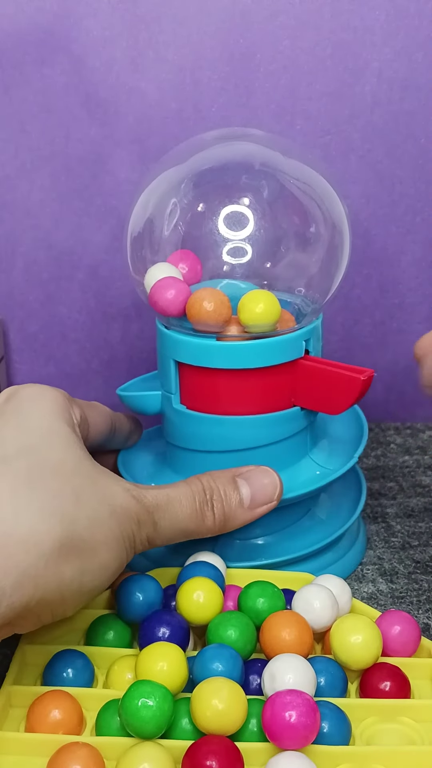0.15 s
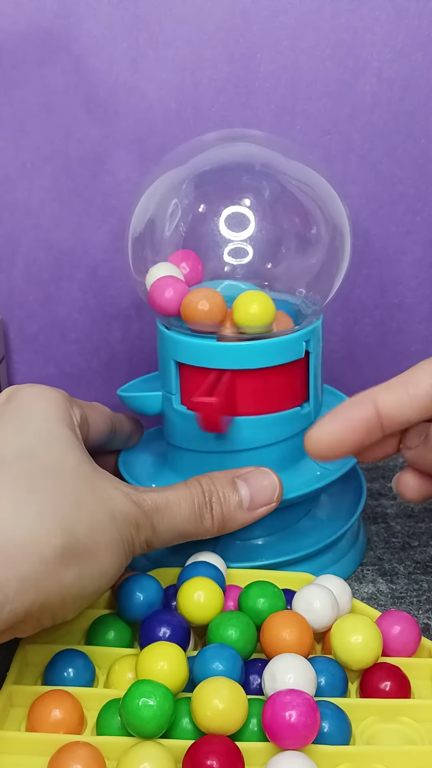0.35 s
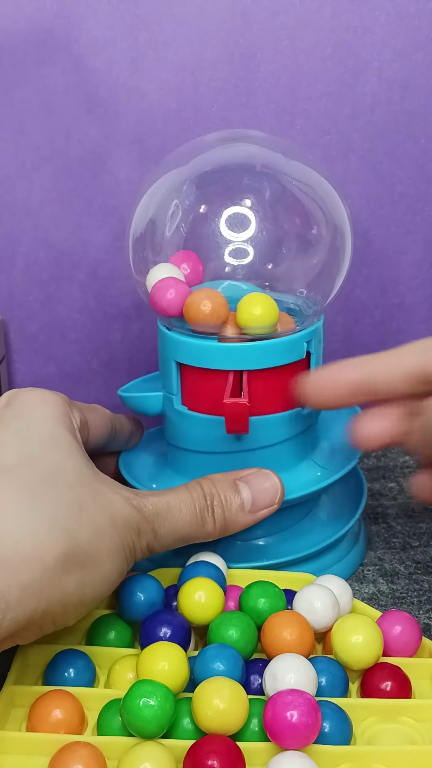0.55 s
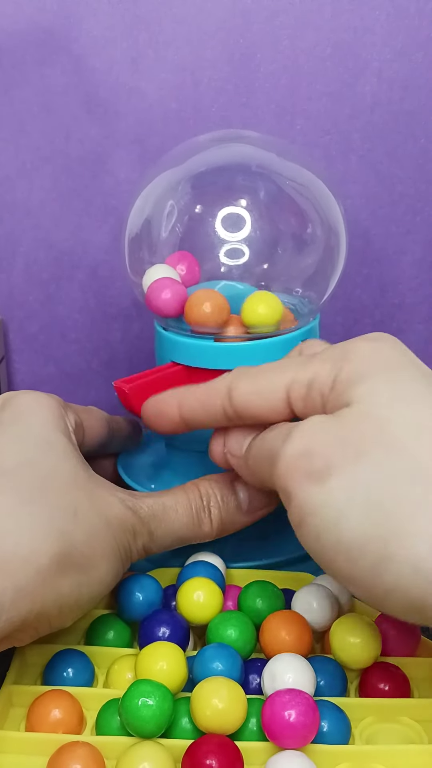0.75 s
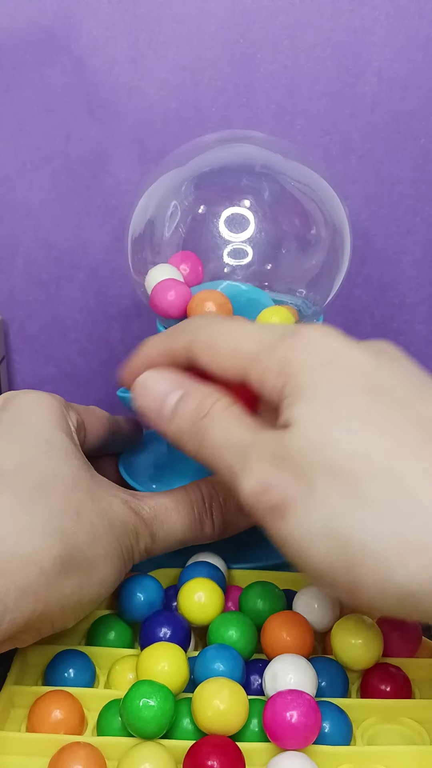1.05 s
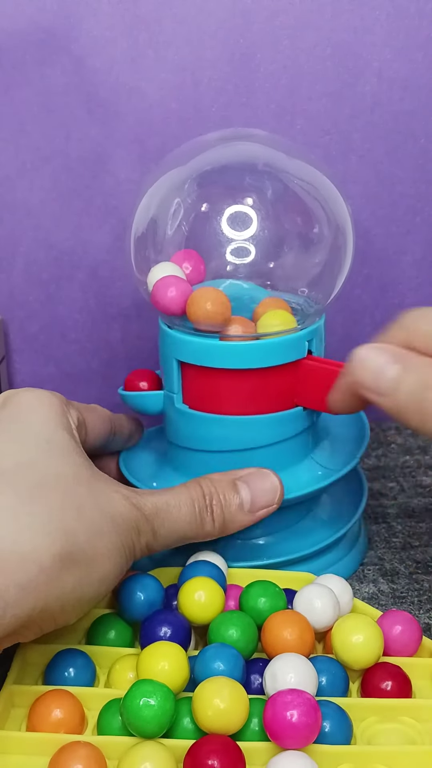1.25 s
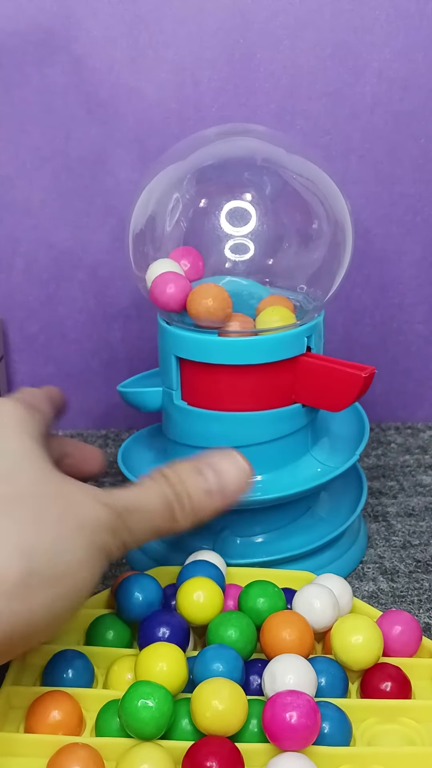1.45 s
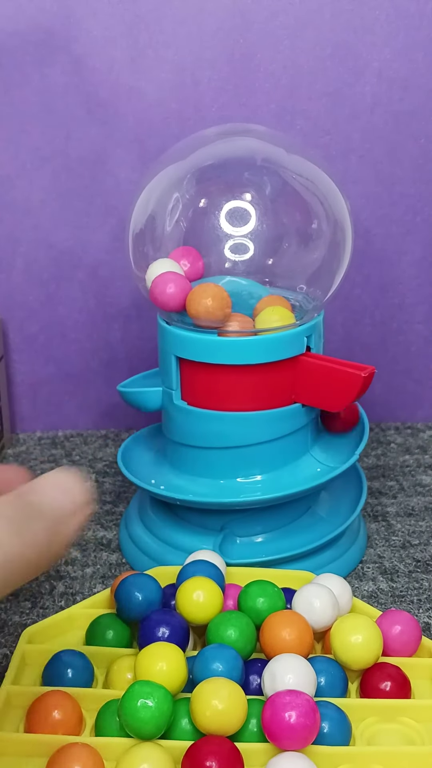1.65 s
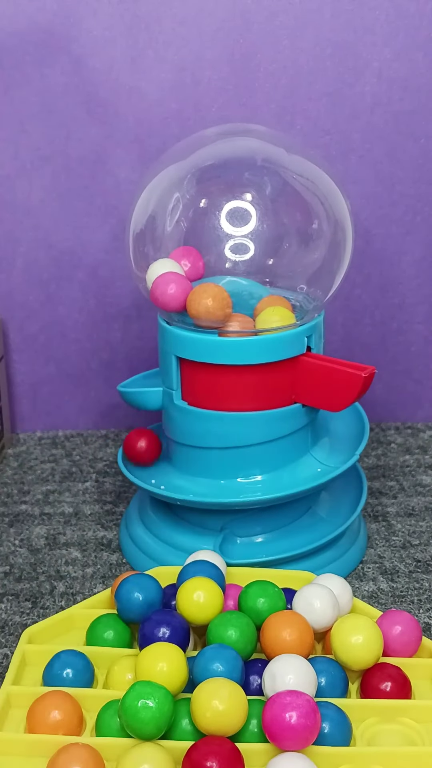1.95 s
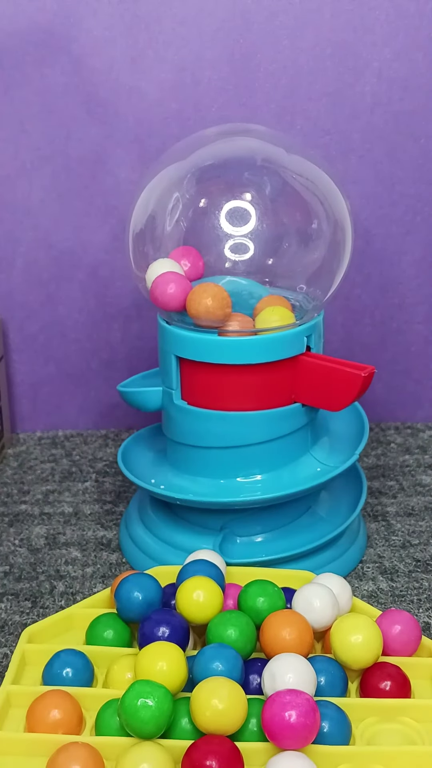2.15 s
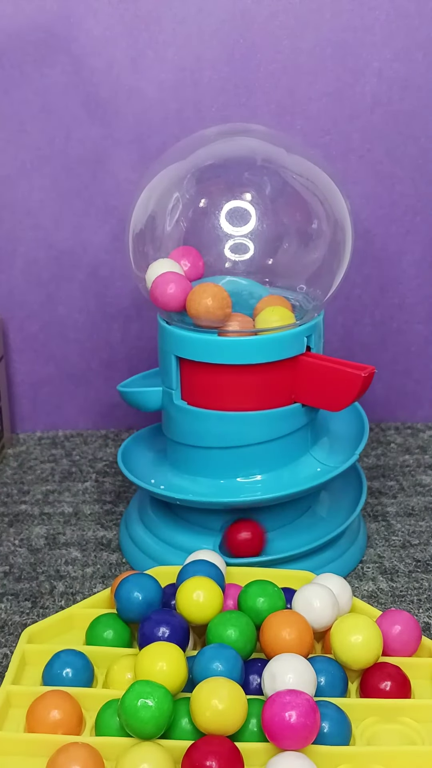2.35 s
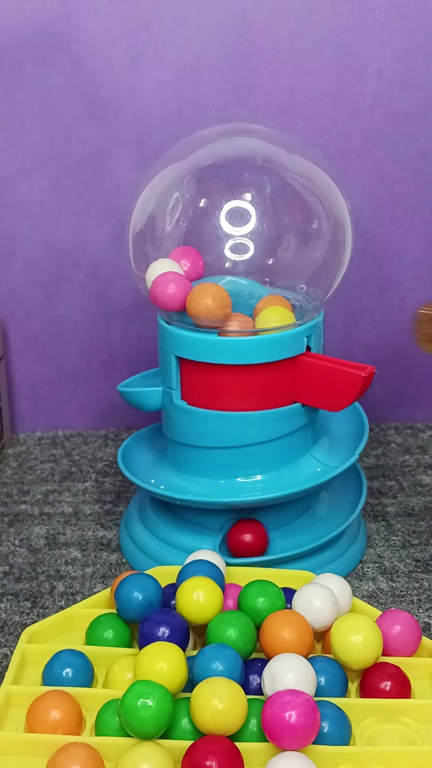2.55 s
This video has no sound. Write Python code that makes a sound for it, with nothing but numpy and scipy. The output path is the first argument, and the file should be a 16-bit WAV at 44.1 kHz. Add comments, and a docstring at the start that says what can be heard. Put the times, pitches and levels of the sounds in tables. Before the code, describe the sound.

Plastic toy lever clacking back and forth, balls knocking, one ball rolling down and bouncing to rest.

```python
"""Toy gumball machine

A hand swings the plastic lever to and fro in a small room. The lever snaps as noise bursts and
damped modes and scrapes as a train of tiny slips; balls knock with filtered bursts. One ball rolls
behind the tower and down the hollow spiral ramp as a rattle of random impacts, partly through wall
modes of gliding pitch, then bounces to rest on a ringing tray. A faint still air lies beneath.
"""
import sys
import numpy as np
from scipy import signal
from scipy.fft import rfft, irfft, next_fast_len
from scipy.io import wavfile

SR = 44100
rng = np.random.default_rng(int(sys.argv[2]) if len(sys.argv) > 2 else 0)


def output_pcm(signal):
    """Save a mono or channel-first signal as 16-bit PCM at the path in sys.argv[1].

    Samples are clipped to [-1, 1] before scaling.
    """
    pcm = np.clip(np.atleast_2d(signal).T, -1, 1) * 32767
    wavfile.write(sys.argv[1], SR, np.round(pcm).astype(np.int16))


N = 116865
T = np.arange(N) / SR
RING_T = T[:12000]  # time axis of one burst, ring or room tail (s)
FILTER_HZ = np.fft.rfftfreq(4096, 1 / SR)


def amp(db):
    """Logarithmic level: decibels become an amplitude gain."""
    return 10 ** (np.asarray(db) / 20)


def read(table, hz, axis=1):
    """Interpolation: one column of a table along a logarithmic frequency axis."""
    columns = np.transpose(table)
    return np.interp(np.log(hz + 1), np.log(columns[0]), columns[axis])


def curve(table, axis=1):
    """Envelope: one dB column of a time table, linear in dB, becomes a gain over the scene."""
    columns = np.transpose(table)
    return amp(np.interp(T, columns[0], columns[axis]))


def unit(x):
    """Energy normalization: the summed square becomes two, one per channel of a stereo pair."""
    return x / np.sqrt(np.sum(x ** 2) / 2 + 1e-20)


def add(mix, start_s, sound):
    """Superposition: a sound is added to the mix from its start time."""
    part = mix[:, round(start_s * SR):][:, :sound.shape[1]]
    part += sound[:, :part.shape[1]]


def dying(t60_s):
    """Exponential decay: the amplitude falls by 60 dB in t60_s."""
    return np.exp(-np.log(1000) * RING_T / t60_s)


# Microphone pair: freq_hz [Hz], likeness [0-1], left_lead_rad [rad], left_minus_right_db [dB]
MICROPHONE_PAIR = [(450, 0.98, 0.65, 0.5), (910, 0.3, 0.2, -5), (2103, 0.34, 1.93, 2), (3230, 0, 3.98, -6),
                   (8800, 0, 2.78, 6), (14400, 0.1, 6.9, 11.5)]


def paired(x):
    """Interchannel coherence: two unrelated signals become as alike as the two microphones hear."""
    hz = np.fft.rfftfreq(x.shape[1], 1 / SR)
    left, other = rfft(x)
    same = np.clip(read(MICROPHONE_PAIR, hz), 0, 1)
    lag = np.exp(-1j * read(MICROPHONE_PAIR, hz, axis=2))
    right = (same * left + np.sqrt(1 - same ** 2) * other) * lag
    return irfft(np.array([left, right]), x.shape[1])


def balance_db(hz):
    """Level difference: half of the pair's imbalance goes to each channel, with opposite signs."""
    return np.array([[.5], [-.5]]) * read(MICROPHONE_PAIR, hz, axis=3)


def colour(x, spectrum):
    """Minimum-phase filter: a causal response of unit energy, with the pair's balance."""
    log = np.log(amp(read(spectrum, FILTER_HZ) + balance_db(FILTER_HZ)))
    log = np.concatenate([log, log[:, -2:0:-1]], axis=1)
    taps = np.fft.ifft(np.exp(np.conj(signal.hilbert(log)))).real
    return signal.fftconvolve(x, unit(taps), axes=1)[:, :x.shape[1]]


SPOT_SHIFT = .05  # largest upward shift, as a share of frequency


def shifted(spectrum):
    """Dependence on the point of impact: the same colour, drawn a little higher or lower."""
    factor = 1 + SPOT_SHIFT * rng.uniform(-0.73, 1)
    return [(hz * factor, db) for hz, db in spectrum]


TREBLE_HZ = 4700  # middle of the shelf's slope


def brighten(x, gain):
    """Shelving: a zero-phase high band is raised or lowered by a gain."""
    size = next_fast_len(2 * x.shape[1])
    hz = np.fft.rfftfreq(size, 1 / SR)
    treble = irfft(rfft(x, size) * (1 - 1 / (1 + (hz / TREBLE_HZ) ** 6)), size)
    return x + (gain - 1) * treble[:, :x.shape[1]]


def burst(t60_s, rise_s):
    """Modal density: a crowd of quickly dying modes merges into noise with an even spectrum."""
    shape = dying(t60_s) * (1 - np.exp(-RING_T / rise_s))
    noise = rng.standard_normal((2, len(RING_T)))
    even = irfft(np.exp(1j * np.angle(rfft(noise * shape))))  # keep the phase, flatten the size
    return unit(paired(even) * np.minimum(1, 10 * dying(t60_s)))


def ring(modes):
    """Modal synthesis: damped sines with a random starting phase at each strike."""
    out = np.zeros((2, len(RING_T)))
    for hz, level_db, t60_s in modes:
        right_lag = np.array([[0], [read(MICROPHONE_PAIR, hz, axis=2)]])
        phase = 2 * np.pi * (hz * RING_T + rng.random()) - right_lag
        out += amp(level_db + balance_db(hz)) * unit(np.sin(phase) * dying(t60_s))
    return out * np.minimum(RING_T / 0.00063, 1)  # short onset ramp


def resonate(x, hz, t60_s):
    """Time-varying resonance: a mode of unit energy whose pitch follows a curve."""
    turn = np.exp(2j * np.pi * np.cumsum(hz) / SR)
    pole = np.exp(-np.log(1000) / (t60_s * SR))
    envelope = signal.lfilter([1], [1, -pole], x / turn)
    return np.sqrt(2 * (1 - pole ** 2)) * (turn * envelope).real


def grains(per_s, spread_db):
    """Random point process: tiny impacts of uneven size and either sign, of mean square two."""
    size = amp(spread_db * np.minimum(rng.exponential(1, N), 3)) * (rng.random(N) < per_s / SR)
    return unit(size * rng.choice([-1, 1], N)) * np.sqrt(N)


def excite(clicks, response, count=10):
    """Impulse response: each click lands on one of several spots, each with its own short answer."""
    spot = rng.integers(0, count, N)
    out = np.zeros((2, N))
    for k in range(count):
        here = (clicks * (spot == k))[None]
        out += signal.oaconvolve(here, response()[:, :2048], axes=1)[:, :N]
    return out


# Spectrum of the still air: freq_hz [Hz], level_db [dB, relative]
AIR_SPECTRUM = [(20, 2), (40, -16), (65, 7), (110, -13.5), (2000, -18.5), (15000, -28)]
AIR_DB = -70


def still_air():
    """Stationary noise: a faint coloured background, steady throughout."""
    return amp(AIR_DB) * colour(paired(rng.standard_normal((2, N))), AIR_SPECTRUM)


# Decay of the room: freq_hz [Hz], t60_s [s]
ROOM_DECAY = [(300, 0.2129), (3700, 0.09), (10000, 0.1745)]


def room(x, gap_s, rise_s):
    """Reverberation: dense reflections of a small room, each band dying at its own speed."""
    noise = paired(rng.standard_normal((2, len(RING_T))))
    hz, t, bands = signal.stft(noise, SR, nperseg=256)
    bands = bands * np.exp(-np.log(1000) * t / read(ROOM_DECAY, hz)[:, None])
    tail = signal.istft(bands, SR)[1][:, :len(RING_T)]
    tail = unit(tail * np.clip((RING_T - gap_s) / rise_s, 0, 1))
    return signal.fftconvolve(x, tail, axes=1)[:, :N]


# Ball rolling round the back of the tower: start_s [s], level_db [dB]
BEHIND_LEVEL = [(1.3, -82), (1.42, -55.5), (1.47, -63.5), (1.56, -55), (1.66, -63), (1.78, -72)]
# Spectrum heard from behind the tower: freq_hz [Hz], level_db [dB, relative]
TOWER_SPECTRUM = [(310, -23), (430, 5), (510, 9.5), (680, -13), (1650, -4.5), (2150, 1), (2700, -16),
                  (3400, -9.5), (5000, -22.5), (15000, -25.5)]


def rolling_behind():
    """Rolling contact: random impacts, coloured by the tower, merge into a murmur."""
    present = (T > BEHIND_LEVEL[0][0]) * (T < BEHIND_LEVEL[-1][0])
    contact = curve(BEHIND_LEVEL) * grains(per_s=1300, spread_db=5.5) * present
    taps = excite(contact, lambda: burst(t60_s=0.024, rise_s=0.0003))
    return colour(taps, TOWER_SPECTRUM)


# Ball rolling down the open ramp: start_s [s], level_db [dB], hollow_body_db [dB]
RAMP_LEVEL = [(1.66, -79.5, -1), (1.75, -62.5, -11), (1.79, -60, -7.5), (1.93, -54, -16), (1.99, -56.5, -2),
              (2.1, -57, 8.5), (2.25, -53.5, 1.5), (2.34, -53, -23), (2.43, -66, -5)]
# Hops on the seams of the ramp: start_s [s], level_db [dB]
SEAM_HOPS = [(1.756, -20.5), (1.772, -20), (1.802, -20.5), (1.814, -21), (1.9, -24), (2.018, -20.5),
             (2.042, -20), (2.069, -19), (2.096, -20), (2.109, -16.5), (2.171, -19), (2.208, -14),
             (2.221, -15.5), (2.241, -21.5), (2.254, -16.5), (2.281, -17.5), (2.302, -18.5), (2.338, -16.5)]
# Ramp wall modes: pitch_hz [Hz], level_db [dB], t60_s [s], swing [share of pitch, round a turn]
WALL_MODES = [(840, -11, 0.028, .2), (1620, -9, 0.02, -.1), (2130, -7.5, 0.018, -.1), (3250, -6, 0.01, .07)]
# Rattle growing duller on the last turn: start_s [s], treble_db [dB]
LAST_TURN_TREBLE = [(2.26, 2.5), (2.33, -10.5)]
# Spectra of the ramp and of the hollow body: freq_hz [Hz], level_db [dB, relative]
RAMP_SPECTRUM = [(60, -1), (300, -21), (620, 3.5), (1150, 2), (2200, 8), (3400, 5), (5500, -7.5),
                 (13000, -10.5), (16000, -29)]
HOLLOW_SPECTRUM = [(40, -26), (190, -30.5), (350, -22.5), (435, -1.5), (525, 1), (615, -18), (850, -14.5),
                   (8000, -61.5)]
LAP_S, FRONT_S = 0.462, 1.93  # one turn of the spiral; a moment of full swing of the wall modes


def rolling_ramp():
    """Rolling contact: impacts rattle the ramp, sweep its wall modes and make the hollow body drone."""
    present = (T > RAMP_LEVEL[0][0]) * (T < RAMP_LEVEL[-1][0])
    contact = curve(RAMP_LEVEL) * grains(per_s=1100, spread_db=3) * present
    for start_s, level_db in SEAM_HOPS:
        contact[round(start_s * SR)] += amp(level_db)
    taps = excite(contact, lambda: burst(t60_s=.009, rise_s=.0002))
    lap = np.cos(2 * np.pi * (T - FRONT_S) / LAP_S)
    wall = np.zeros((2, N))
    for pitch_hz, level_db, t60_s, swing in WALL_MODES:
        wall += amp(level_db) * resonate(taps, pitch_hz * (1 + swing * lap), t60_s)
    rattle = brighten(amp(-4) * colour(taps, RAMP_SPECTRUM) + wall, curve(LAST_TURN_TREBLE))
    drone = amp(-8.0) * colour(taps * curve(RAMP_LEVEL, axis=2), HOLLOW_SPECTRUM)
    return rattle + drone


# Bounces in the bottom tray: start_s [s], level_db [dB]
TRAY_BOUNCES = [(2.376, -11), (2.3804, 1.5), (2.426, -6), (2.43, -13), (2.4383, -5.5), (2.4462, -13),
                (2.451, -15), (2.5256, -25), (2.583, -31.5), (2.6034, -14.5), (2.62, -19)]
# Tray modes: pitch_hz [Hz], level_db [dB], t60_s [s]
TRAY_MODES = [(831, -23.5, .12), (1597, -8.5, 0.033), (1860, -9.5, 0.035), (3550, -23.5, 0.032)]
# Spectrum of a ball's clack: freq_hz [Hz], level_db [dB, relative]
BALL_SPECTRUM = [(60, -26), (300, -30.5), (600, -16.5), (1300, -11.5), (1650, -4), (2000, 1.5), (2500, -7),
                 (3400, -3.5), (4200, -14), (6000, -23), (13500, -32), (16000, -51.5)]
HARDNESS = 0.44  # extra dB of clack and boom for each dB of force


def tray():
    """Nonlinear impact: soft bounces mostly ring the tray, hard ones add more clack and hollow boom."""
    out = np.zeros((2, N))
    for start_s, level_db in TRAY_BOUNCES:
        crowd = burst(t60_s=0.0072, rise_s=.0001) + amp(-4.5) * burst(t60_s=0.086, rise_s=0.00077)
        clack = colour(crowd, BALL_SPECTRUM)
        boom = colour(burst(t60_s=0.064, rise_s=0.0014), HOLLOW_SPECTRUM)
        hard = amp(HARDNESS * level_db) * (clack + amp(-17.5) * boom)
        add(out, start_s, amp(level_db) * (ring(TRAY_MODES) + hard))
    return out


# Balls knocking on plastic and on each other:
# start_s [s], level_db [dB], treble_db [dB], hollow_body_db [dB, before a common cut]
BALL_KNOCKS = [(0.0625, -10, 2, -3.5), (0.1094, 0.5, 4.5, -1), (0.7126, 2, 10.5, 6.5), (0.7561, -4, 4, 5.5),
               (.783, -12.5, 10, -18), (0.788, -4.5, 0, -24), (0.8361, -8.5, 8.5, 12),
               (0.89, -16.5, -6, 10.5), (0.8977, -3.5, 6.5, -20), (0.9436, -17, 18, 3),
               (1.095, -26, -14, 19.5), (1.149, -18.5, 8, 18), (1.159, -10.5, 10, 13),
               (1.185, -13, 12.5, 10), (1.199, -7.5, -23, 0), (1.215, -17.5, 9, 25.5),
               (1.2236, -4, 6, 11.5), (1.268, -13, 6, 2), (1.2941, -13, 9, 17), (1.355, -17.5, 12, -14)]


def balls():
    """Impact: a hard contact spike and a plastic clack, with a slower-rising hollow body."""
    out = np.zeros((2, N))
    for start_s, level_db, treble_db, body_db in BALL_KNOCKS:
        spike = burst(t60_s=.005, rise_s=.0001)
        short = amp(-3.0) * burst(t60_s=0.019, rise_s=0.002)
        long = amp(-6.5) * burst(t60_s=0.19, rise_s=0.0026)
        clack = brighten(colour(spike + short + long, shifted(BALL_SPECTRUM)), amp(treble_db))
        body = colour(burst(t60_s=0.14, rise_s=0.0023), shifted(HOLLOW_SPECTRUM))
        add(out, start_s, amp(level_db) * (clack + amp(body_db - 14) * body))
    return out


# Lever snaps: start_s [s], level_db [dB], treble_db [dB], shell_ring_db [dB], spring_ping_db [dB]
LEVER_SNAPS = [(0.3056, -14.5, 11, 1, -27), (0.348, -15, 3.5, 4, -26.5), (0.3554, -2.5, 5.5, 1.5, -0.5),
               (0.3775, -7, 8, 9, -25), (0.407, -29, 2, 16.5, -17), (0.493, -41, -7, 11.5, -20.5),
               (0.6221, -20, 5, -6, -30), (0.633, -16, -9, 4.5, -14), (0.6875, -1.5, 5, 4.5, -4.5),
               (0.8021, -14.5, 4.5, 4, 9.5), (0.906, -33.5, 19.5, -17, 10), (1.043, -25.5, -2.5, -0.5, -27)]
# Lever scraping in its slot: start_s [s], level_db [dB]
SCRAPE_LEVEL = [(.3, -103), (.31, -41), (.4, -33.5), (.45, -52.5), (.615, -92), (.63, -45), (.72, -36.5),
                (.77, -46), (.82, -35.5), (.87, -53.5), (.97, -47), (1.03, -73.5), (1.18, -46.5),
                (1.3, -48.5), (1.42, -69.5)]
# Spectrum of the lever: freq_hz [Hz], level_db [dB, relative]
LEVER_SPECTRUM = [(40, -29), (75, -7.5), (155, -6.5), (270, -21), (480, -2), (1000, -2.5), (1400, -9),
                  (1950, 5.5), (2450, -5.5), (3500, 2.5), (4800, -0.5), (5600, -11), (9300, -11),
                  (14000, -15.5), (16000, -30.5)]
# Shell modes: pitch_hz [Hz], level_db [dB, mean over strikes]
SHELL_MODES = [(1885, 0.5), (2034, -1.5), (2895, -9), (3092, -10.5), (3275, -15.5), (3532, -6), (3920, -10),
               (4300, -8.5), (4670, -9), (4875, -11.5)]
# Spring modes: pitch_hz [Hz], level_db [dB], t60_s [s]
SPRING_MODES = [(12690, -5, .085), (12950, -13, .07)]
SHELL_T60_S, SHELL_DAMPING = 0.13, 0.65  # ring time at 1 kHz; exponent of its fall with pitch
STRIKE_DB = 4  # spread of each shell mode from snap to snap


def shell_ring():
    """Frequency-dependent damping: higher shell modes die sooner, their levels vary by strike."""
    modes = []
    for pitch_hz, level_db in SHELL_MODES:
        struck_db = level_db + STRIKE_DB * rng.standard_normal()
        modes.append((pitch_hz, struck_db, SHELL_T60_S * (1000 / pitch_hz) ** SHELL_DAMPING))
    return ring(modes)


def lever_snaps():
    """Impulsive excitation: a snap cracks, chatters in the housing and rings body, shell and spring."""
    out = np.zeros((2, N))
    for start_s, level_db, treble_db, shell_db, spring_db in LEVER_SNAPS:
        chatter = amp(-0.5) * burst(t60_s=0.093, rise_s=0.00036)
        crack = colour(burst(t60_s=0.038, rise_s=0.0012) + chatter, LEVER_SPECTRUM)
        body = colour(burst(t60_s=0.16, rise_s=0.0035), shifted(HOLLOW_SPECTRUM))
        sound = amp(7.5) * crack + amp(4) * body
        sound += amp(shell_db) * shell_ring() + amp(spring_db) * ring(SPRING_MODES)
        add(out, start_s, amp(level_db) * brighten(sound, amp(treble_db)))
    return out


def lever_scrape():
    """Sliding friction: a train of tiny random slips, coloured by the lever."""
    slips = curve(SCRAPE_LEVEL) * grains(per_s=490, spread_db=1)
    taps = excite(slips, lambda: burst(t60_s=.009, rise_s=.0002), count=5)
    return colour(taps, LEVER_SPECTRUM)


def scene():
    """Superposition: air, rolling ball, knocks, tray and lever, with the room's reverberation."""
    air = still_air()
    roll = rolling_behind() + rolling_ramp()
    knocks = tray() + balls()
    lever = lever_snaps() + lever_scrape()
    send = amp(-6.5) * lever + amp(-8) * knocks + amp(-6.0) * roll
    return lever + knocks + roll + air + room(send, gap_s=0.0022, rise_s=0.0016)


CUT_HZ = 16000


def record(dry):
    """Band limitation: a linear-phase low-pass stands for the recorder's upper limit."""
    taps = signal.firwin(201, CUT_HZ, window=("kaiser", 9), fs=SR)
    return signal.oaconvolve(dry, taps[None], "same")


dry = scene()
out = record(dry)
output_pcm(out)
```